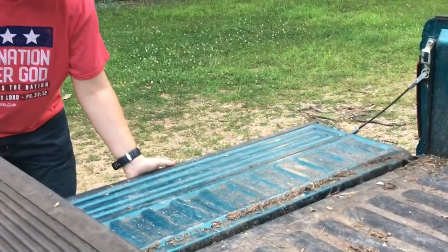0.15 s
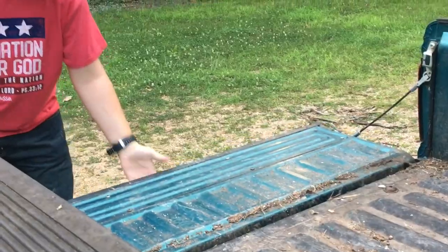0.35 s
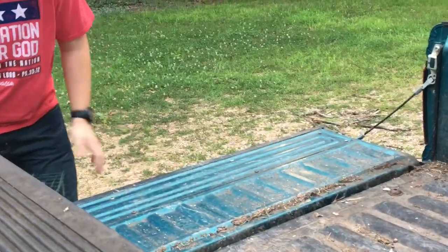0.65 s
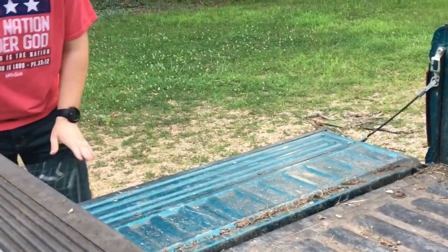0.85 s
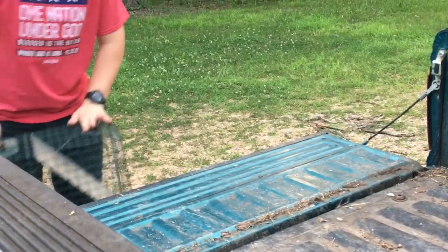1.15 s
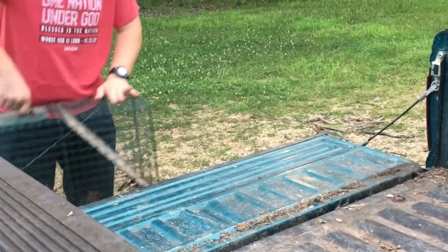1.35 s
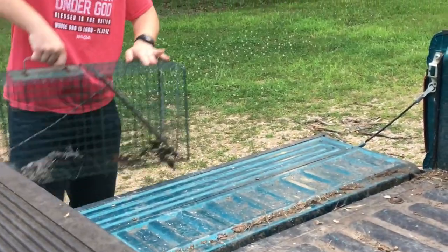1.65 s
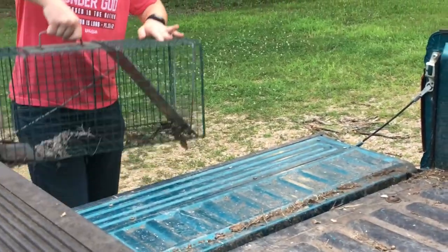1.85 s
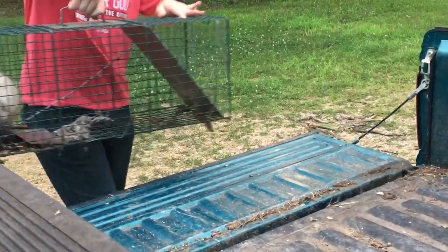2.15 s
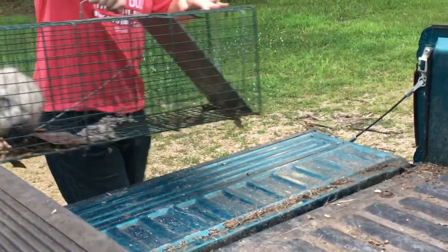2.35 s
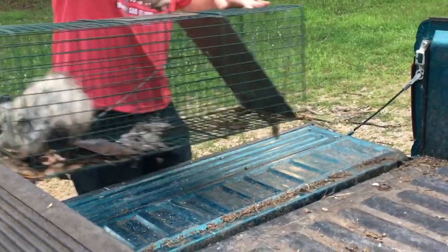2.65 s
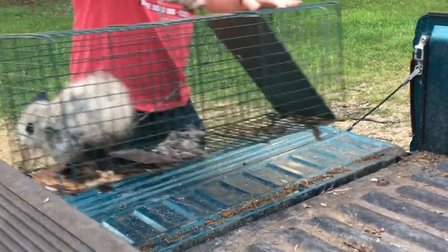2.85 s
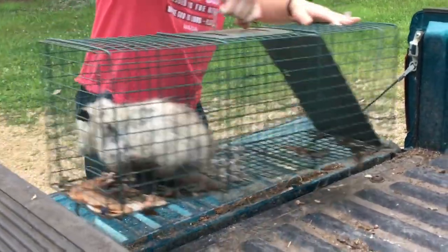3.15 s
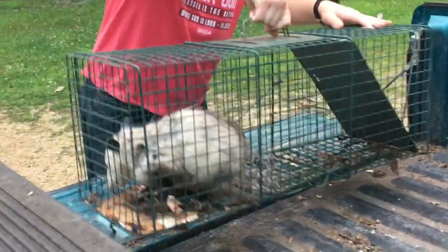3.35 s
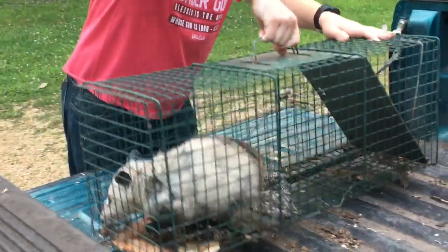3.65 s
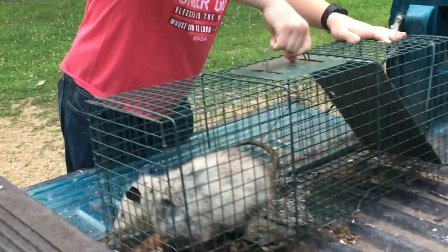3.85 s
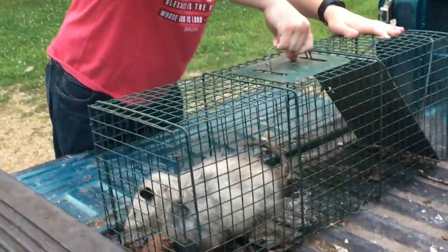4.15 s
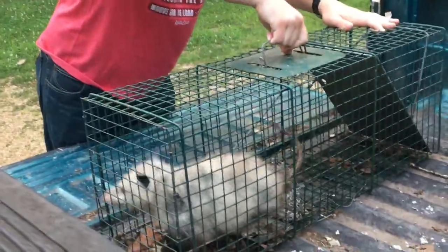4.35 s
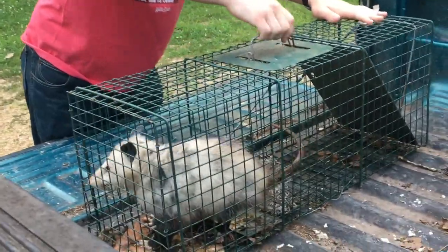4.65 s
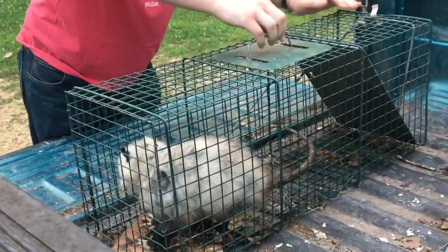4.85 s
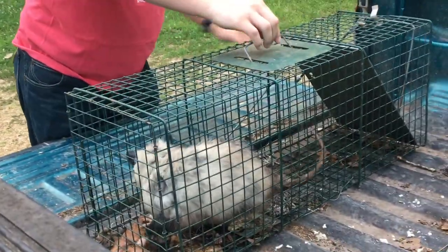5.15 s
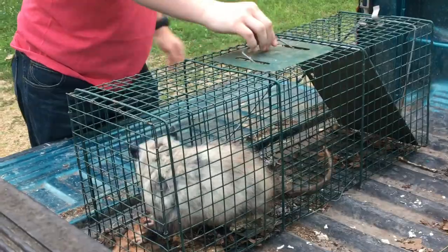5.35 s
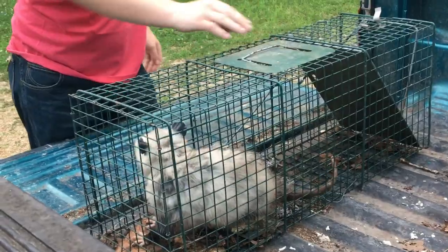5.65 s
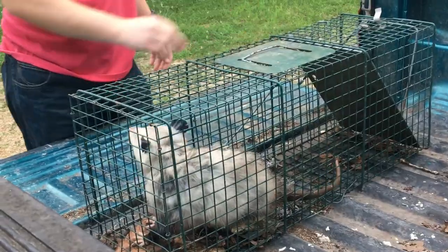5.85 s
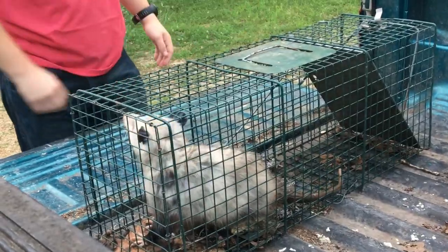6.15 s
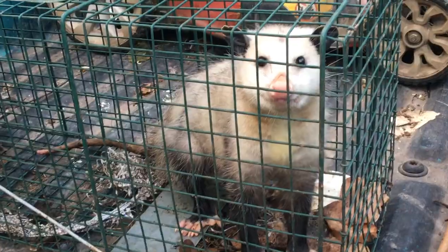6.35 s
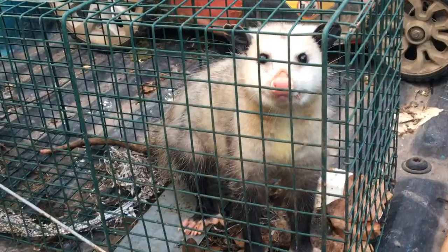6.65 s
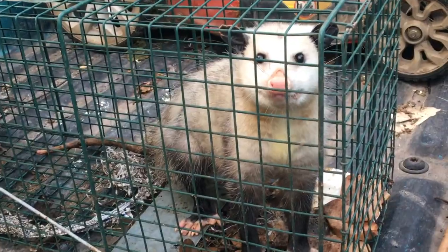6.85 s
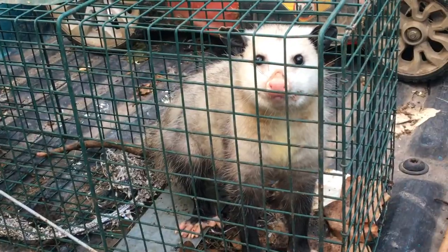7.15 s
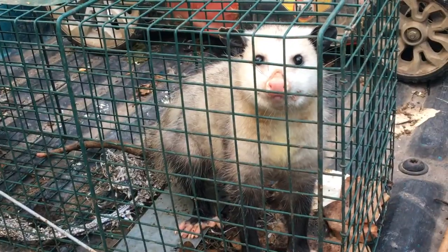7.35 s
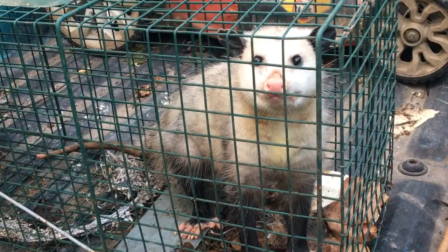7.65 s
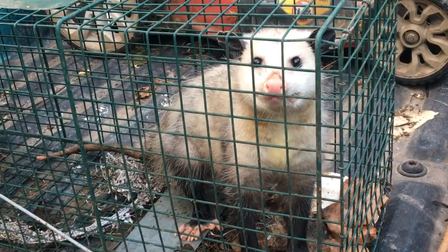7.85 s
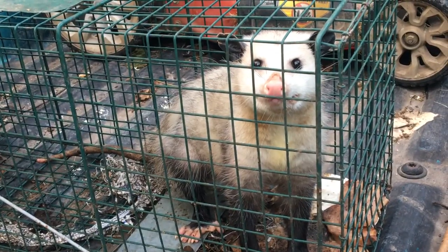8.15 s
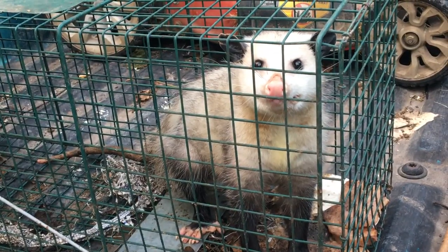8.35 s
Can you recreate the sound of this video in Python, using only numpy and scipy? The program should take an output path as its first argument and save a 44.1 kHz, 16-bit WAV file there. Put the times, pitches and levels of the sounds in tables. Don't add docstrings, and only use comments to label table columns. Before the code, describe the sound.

A quiet farm yard, close to a truck's steel bed, with soft leaves, faint traffic rumble and a steady fast cricket trill. A songbird whistles high in the first second, and distant crows caw hoarsely from about 0.6 to 2.5 s, with a few fainter caws until 3.7. Wire ticks and small frame scrapes accompany the lifting, with a dull bump at 0.9 s. Bumps at 2.75 s precede a sharp sheet-metal snap at 2.94. At 4.07 s the loaded cage lands with the loudest, booming, bouncing clang. Scraping shoves and hollow knocks follow at 4.75 and 5.4 s, dying away by 6. At 6.26 s a brief dip switches to another yard spot with faint hum and cricket. A slight tick at 7.25 precedes a rooster: short piercing note to 7.5, then a long lower, rough, throbbing cry, with faint bird trills, running to the end at 8.5 s.

```python
import sys
import numpy as np
from scipy import signal
from scipy.fft import rfft, irfft, next_fast_len
from scipy.io import wavfile
from scipy.ndimage import uniform_filter1d

SR = 44100
rng = np.random.default_rng(int(sys.argv[2]) if len(sys.argv) > 2 else 0)


def dump(signal):
    limited = np.clip(np.atleast_2d(signal).T, -1, 1)
    pcm = np.round(limited * 32767).astype(np.int16)
    wavfile.write(sys.argv[1], SR, pcm)


def attenuation_scalar(level_db):
    decades = np.asarray(level_db, float) / 20
    return 10 ** decades


N = 374409
T = np.arange(N) / SR
CUT_S = 6.263

# frequency in Hz, level in dB per Hz.
YARD_COLOUR = [(12, -38), (20, 0.5), (65, 3.5), (228, -9.5), (347, -16.5), (399, -24.5), (759, -21.5),
               (1030, -20.5), (1190, -22.5), (3070, -31.5), (4420, -30), (4810, -23.5), (5380, -38.5),
               (12400, -41), (16000, -50.5)]
# frequency in Hz, level in dB per Hz.
LATE_YARD_COLOUR = [(12, -43), (20, -10), (44, 21.5), (70, 1), (301, -24), (607, -29), (759, -32),
                    (873, -29.5), (1260, -31.5), (1400, -34), (3530, -38), (4810, -29), (5380, -41),
                    (12100, -43.5), (16000, -51)]
# frequency in Hz, level in dB per Hz.
RUMBLE_COLOUR = [(22, -27.0), (40, -4.5), (75, -1), (120, -10.5), (200, -19.0), (400, -60.0)]
# time in seconds, level in dB.
TRAFFIC_LEVEL = [(0.0, -51.5), (0.31, -48), (0.57, -58.5), (2.72, -61), (3.31, -54), (3.74, -59),
                 (4.11, -58.5), (4.26, -41), (4.52, -50.5), (5.44, -53), (6.02, -47), (6.15, -59),
                 (6.29, -51.5), (8.49, -51.5)]
# frequency in Hz, width in Hz, level in dB.
SHED_HUM = [(903, 18.7, 5), (1450, 16, -4), (1840, 95, -2.5), (3952, 86, 3)]
# strokes per second, cycles already done at 0 s.
CRICKET_RHYTHM = [
    (36.5966, .138),
    (36.7302, -1.0698),
]

# time in seconds, pitch in Hz, level in dB.
LONG_WHISTLE = [(0.0, 4120, -58), (.03, 4330, -53), (0.055, 4380, -58), (0.122, 4360, -72),
                (.15, 4560, -60), (0.19, 4630, -55), (0.28, 4763, -72), (.33, 4050, -66), (0.37, 3600, -68),
                (0.43, 3370, -68), (.5, 3430, -67), (0.654, 3725, -65), (.95, 3838, -64), (1.17, 3932, -77)]
# time in seconds, pitch in Hz, level in dB.
DROPPING_WHISTLE = [(.04, 4302, -67.5), (.06, 4296, -52), (.095, 3336, -73.5), (.1, 3250, -81.5)]
# time in seconds, pitch in Hz, level in dB.
LATE_TRILL = [(7.59, 3950, -68), (7.7, 4250, -59), (7.85, 4600, -62), (7.96, 4750, -70)]
# time in seconds, pitch in Hz, level in dB.
LATE_WHISTLE = [(7.98, 4050, -69.5), (8.104, 3479, -66), (8.49, 4037, -61)]

# frequency in Hz, level in dB per Hz.
MESH_COLOUR = [(1760, -25), (3000, 6.5), (3380, 3.5), (4230, 0), (4860, -19), (5520, -2.5), (10300, -11),
               (11700, -10.5), (16000, -18)]
# frequency in Hz, level in dB per Hz.
ROD_COLOUR = [(1500, -8), (2600, -1.5), (3400, 1.5), (5000, -4), (6500, -36.5)]
# frequency in Hz, level in dB per Hz.
FRAME_COLOUR = [(250, -9.5), (400, -1), (700, -2.5), (1000, -3.5), (1500, -4), (2000, -3.5), (2800, -18),
                (4500, -39)]
# frequency in Hz, level in dB per Hz.
PUSH_COLOUR = [(30, -34.5), (70, 9.0), (300, 13), (600, 5.5), (1200, -33.0)]
# frequency in Hz, width in Hz, level in dB.
WIRE_MODES = [(1410, 27.8, 5), (1700, 50, 3), (1900, 45, 1), (2600, 93, -7.5), (3450, 60, -3),
              (4120, 83, -3.5), (5460, 100, -9.5), (5880, 42, -29), (6440, 44, -16), (8350, 20, -25),
              (11400, 210, -28.5), (12800, 255, -6.5), (13200, 39, -3)]
# frequency in Hz, level in dB, time to fall 60 dB in seconds.
TAILGATE_MODES = [(74.83, 1.5, 0.5), (154, -11, 0.4), (227.9, -10, 0.18), (279.4, -12, 0.178),
                  (305, -8, 0.07), (412.5, -11, .1), (464.7, -13, 0.1), (552, -14, 0.12)]
# time in seconds, peak in dB, reach into heavier parts in dB, decay in seconds.
WIRE_TICKS = [(.2804, -56, -8, 0.5), (.5269, -41, -5, 0.025), (.6438, -54, -2.5, 0.104),
              (.8025, -54, -24.5, 0.094), (1.0163, -52.5, -9.5, 0.094), (1.1707, -50.5, -3, 0.132),
              (1.22, -48.5, -18.5, .14), (1.2739, -44.5, -30, 0.162), (2.549, -50.5, -25.5, 0.145),
              (2.8952, -47, -21, .1), (2.9438, -21.5, -13, 0.0864), (3.051, -47.5, -9.5, 0.051),
              (3.2168, -58, -1.5, 0.188), (3.553, -52, -13, 0.045), (3.6104, -55.5, -2.5, 0.163),
              (3.705, -46.5, -12, 0.048), (3.991, -42.5, -14, .04), (4.0419, -49, -8, 0.17),
              (4.057, -42, 2, .08), (4.286, -45.5, -14.5, .066), (4.314, -53, -1.5, 0.115),
              (4.596, -53, -5.5, 0.15), (5.1868, -43.5, -6.5, 0.12), (.8681, -45, -12, .04),
              (1.6304, -49, -12, .03), (2.8401, -50, -15, .04), (4.2185, -47, -10, .06)]
# time in seconds, peak in dB, brightness in dB, decay in seconds.
FRAME_SCRAPES = [(.4903, -52.5, -4, 0.0313), (.8585, -57.5, -3.5, 0.0706), (.8885, -46, -1.5, 0.065),
                 (1.3915, -55, -12.5, 0.029), (1.5998, -56.5, -10.5, 0.0835), (2.1879, -53, -16, 0.102),
                 (2.2486, -55, -20, 0.0677), (2.33, -53.5, -18.5, 0.082), (2.397, -53.5, -11.5, 0.065),
                 (2.7176, -47, -22, 0.085), (4.6313, -54, -3, 0.29), (4.724, -45.5, -0.5, 0.284),
                 (5.058, -61.5, 0.5, 0.447), (5.3953, -41, 2.5, 0.331), (5.6194, -52.5, -23, 0.18),
                 (5.9086, -56.5, -24.5, 0.168), (7.2458, -54.5, -2.5, 0.0325)]
# time in seconds, peak in dB, brightness in dB, decay in seconds.
TRAP_BUMPS = [(.1899, -52.5, -1, 0.293), (.9034, -37, -17, 0.115), (.9222, -35, -9.5, 0.096),
              (.9394, -39, -19.5, 0.12), (1.1348, -49, 2.5, 0.21), (1.6281, -52, -5, 0.0848),
              (2.4565, -46.5, -11, 0.0404), (2.732, -40.5, -10.5, 0.099), (2.7423, -38, -3, 0.079),
              (2.7587, -36, -18.5, 0.084), (2.7762, -36, -14, 0.05), (4.0655, -26, -14.5, 0.07),
              (4.2078, -41.5, -3.5, 0.204), (4.746, -37.5, -6.5, 0.208), (4.8456, -45, -12.5, 0.193),
              (5.438, -35, 4.5, 0.195)]
# time in seconds, peak in dB, brightness in dB, decay in seconds.
WEIGHT_BOUNCES = [
    (4.075, -25.5, -11.5, 0.112),
    (4.0997, -27.5, -6.5, 0.175),
    (4.1291, -28, -7.5, 0.0904),
    (4.345, -36, -9.5, 0.125),
]
TICK_SPREAD = [(0, 0.012, -3.5, -22), (0, 0.998, 1.4, 1.32)]
SCRAPE_SPREAD = [(0, -0.83, 0, -6), (1, 0.69, 0, -0.5)]
BUMP_SPREAD = [(0, -5.5, -6, 0), (1, 1, 0, 0)]
BOUNCE_SPREAD = [(0, -7.5, -23, 0), (1, 1, -0.5, 0)]
# time in seconds, effort in dB.
HAND_EFFORT = [(0, -84), (.73, -66.5), (1.11, -62.5), (1.36, -70.5), (2.05, -73.5), (2.38, -68),
               (2.5, -59.5), (2.53, -67.5), (2.85, -62), (3.25, -76.5), (4.15, -67), (4.4, -76.5),
               (5.04, -78), (5.35, -64), (5.67, -79), (6.24, -81.5)]
# time in seconds, peak in dB, seconds to fall 20 dB.
WEIGHT_SHOVES = [
    (0, -54, .5),
    (1.11, -61, 0.03),
    (2.85, -64, 2.),
    (4.22, -32.5, 0.3335),
    (4.81, -44, 0.455),
    (5.28, -50, 0.19),
    (5.53, -37.5, .3),
    (5.75, -54, 0.3),
]
# time in seconds, peak in dB, pitch in Hz, twice the time to fall
# 60 dB in seconds, push length in seconds.
STRUCK_PARTS = [(0.5265, -44, 4100, .015, .001), (.527, -48, 2800, 0.014, .001),
                (0.896, -45.5, 624.4, 0.062, .02), (1.3917, -49, 1305, 0.019, 0.00195),
                (2.205, -53, 1498, 0.0524, .015), (2.344, -50.5, 1518, 0.053, .012),
                (2.348, -56.5, 1950, .04, .01), (2.457, -41.5, 623, 0.0304, 0.00255),
                (2.9445, -36, 3600, .03, .004), (2.9445, -40, 1900, .03, .003),
                (2.738, -39, 390, .06, .012), (3.992, -50.5, 5195, .02, .002),
                (4.0654, -24.5, 1150, 0.0286, .002), (4.066, -29, 930, .04, .003),
                (4.09, -31, 545, .05, .004), (4.0649, -29, 2600, 0.0072, 0.00102),
                (4.0705, -15, 291, .06, 0.0039), (4.092, -28, 380, 0.035, 0.00227),
                (4.11, -31, 259, .08, 0.0053), (4.214, -45.5, 1860, .04, 0.0087),
                (4.342, -38, 310, .12, .01), (4.224, -33, 280, 0.084, 0.0062),
                (4.724, -44, 2050, 0.03, 0.012), (4.729, -42.5, 3311, 0.048, 0.018),
                (4.745, -39.5, 1703, .04, 0.0124), (4.747, -44, 3386, 0.036, 0.0125),
                (4.757, -33.5, 301, 0.053, 0.0031), (4.763, -39.5, 1800, .04, .006),
                (4.778, -36.5, 332, .08, 0.0042), (4.788, -43, 1698, 0.06, 0.0147),
                (5.395, -42, 1795, .04, 0.0103), (5.42, -38, 150, .2, .03),
                (5.406, -37.5, 296.5, .08, 0.0088), (5.407, -38.5, 1752, 0.043, 0.0124),
                (5.424, -39.5, 1897, .04, 0.0113), (5.4405, -29, 332.4, 0.044, 0.0035),
                (5.445, -41, 3500, 0.055, 0.0146), (5.483, -38.5, 301, 0.088, 0.0059),
                (5.51, -37.5, 252, 0.046, 0.0032), (7.244, -47.5, 1400, .015, 0.00102)]

# start in seconds, length in seconds, strongest partial at its top in Hz, level in dB.
CROW_CAWS = [(0.581, 0.136, 1410, -63.5), (.72, 0.154, 1298, -57), (0.999, 0.269, 1439, -61.5),
             (1.445, 0.255, 1330, -57), (1.699, 0.118, 1503, -61.5), (1.862, 0.158, 1400, -59),
             (2.02, 0.261, 1366, -56), (2.2, .09, 1250, -59), (2.27, .08, 1420, -63),
             (2.385, 0.16, 1390, -59.5), (2.99, 0.22, 1450, -66), (3.19, .12, 1400, -70),
             (3.55, .2, 1343, -62)]
# frequency in Hz, level in dB, time to fall 60 dB in seconds.
DOOR_MODES = [(690, -8.5, 0.0174), (1400, -6, 0.024), (1950, -1.5, 0.0175), (3726, -4.5, 0.0086)]
# frequency in Hz, level in dB, time to fall 60 dB in seconds.
CORNER_MODES = [(78.34, -6.5, 0.25), (150, -14, 0.12), (280, -6.5, 0.072), (325, -1, 0.1), (430, -21, 0.06),
                (548.3, -1, 0.09), (1200, -26, 0.028), (2100, -27, .02)]

# time in seconds, pitch in Hz, level in dB, roughness from 0 to 1.
MAIN_MEMBRANE = [
    [(7.27, 1588, -56, 0.06), (7.29, 1445, -47, 0.14), (7.325, 1442, -43.5, 0.13), (7.345, 1435, -55, .2),
     (7.372, 1400, -52, 0.21), (7.388, 1418, -34.5, 0.05), (7.452, 1420, -35, 0.09),
     (7.463, 1426, -52, 0.3), (7.535, 1427, -46, 0.31)],
    [(7.545, 700.6, -48.5, 0.6), (7.62, 774.7, -45.5, 0.52), (7.71, 735.7, -45.5, 0.68),
     (7.79, 778.6, -38, 0.28), (7.95, 783, -38.5, 0.3), (8.1, 750, -41.5, 0.36), (8.3, 744.5, -43.5, 0.31),
     (8.4, 737.9, -48.5, 0.34), (8.49, 748.3, -42, 0.25)],
]
# time in seconds, pitch in Hz, level in dB, roughness from 0 to 1.
SECOND_MEMBRANE = [
    [(7.27, 618.1, -61, 0.85), (7.29, 570.1, -56, 0.4), (7.35, 575, -56, .35), (7.38, 597, -48, .45),
     (7.43, 590, -51, .55), (7.53, 584.8, -55, 0.73)],
    [(7.545, 761.6, -47, 0.694), (7.575, 860, -44.5, 0.36), (7.66, 858.2, -46.5, 0.616),
     (7.75, 842.8, -49, 0.676), (7.95, 819, -47, 0.45), (8.1, 799.4, -51, 0.66)],
]
# half-pitch share from 0 to 1, seconds to settle, high partials in dB.
HALF_PITCH = [
    (0.42, 2., -7),
    (.75, 0.19, 1.5),
    (1.1, 0.38, 7),
    (0.45, 0.22, -3),
]
# frequency in Hz, level in dB.
BEAK_COLOUR = [(300, -43.5), (580, -9.5), (750, -6.5), (1150, 0), (1500, 0.5), (1750, -3), (2070, 0),
               (2240, -29.5), (3000, -12.5), (3800, -41), (4600, -37.5), (5300, -28), (5700, -37),
               (6200, -22.5), (7200, -24), (9000, -36.5), (11000, -43), (14000, -45)]
# frequency in Hz, level in dB.
RASP_COLOUR = [(500, -11.5), (1100, -11), (1500, 6.5), (2000, -6.5), (2500, -20.5), (3500, -20),
               (5500, -24), (6300, -15), (7600, -15), (10000, -36)]
# time in seconds, peak in dB.
STEP_SWELLS = [(7.7858, -30), (7.8377, -33), (7.8731, -32), (7.8936, -30), (7.925, -30), (7.9494, -27),
               (7.9839, -28), (8.0198, -33), (8.0467, -33), (8.0707, -33), (8.1076, -34), (8.1699, -35),
               (8.1909, -36), (8.2193, -35), (8.2388, -34), (8.2712, -36), (8.2971, -38), (8.3186, -39),
               (8.34, -39), (8.3595, -39), (8.3839, -40), (8.4204, -38), (8.4418, -40), (8.4717, -36)]
# time in seconds, pitch in Hz, level in dB.
SIDE_TONES = [
    [(7.268, 1900, -52), (7.285, 1900, -53), (7.31, 2040, -50), (7.335, 2050, -53), (7.355, 2060, -60),
     (7.385, 2030, -49), (7.41, 2060, -58), (7.47, 2050, -62)],
    [(7.4, 700, -64), (7.43, 725, -58), (7.48, 720, -58), (7.53, 700, -63)],
    [(7.536, 1880, -56), (7.545, 1910, -48), (7.556, 1900, -55)],
    [(7.3, 2860, -64), (7.36, 2960, -54), (7.4, 2890, -60), (7.5, 2900, -68), (7.56, 2960, -55),
     (7.6, 2950, -62)],
]


def unit(x):
    return x / np.sqrt(np.mean(x ** 2))


def colour(x, points, lo_hz=0, scale=True):
    size = next_fast_len(len(x), True)
    f = np.fft.rfftfreq(size, 1 / SR) + 1
    p = np.array(points, float)
    gain = attenuation_scalar(np.interp(np.log(f), np.log(p[:, 0]), p[:, 1]))
    gain = gain / (1 + (lo_hz / f) ** 6)
    y = irfft(rfft(x, size) * unit(gain), size)[:len(x)]
    return unit(y) if scale else y


def ring(x, hz, t60):
    r = np.exp(-np.log(1000) / (max(t60, .002) * SR))
    w = 2 * np.pi * hz / SR
    return signal.lfilter([2 * (1 - r) * np.sin(w)], [1, -2 * r * np.cos(w), r * r], x)


def ring_modes(x, modes):
    rings = [ring(x, hz, t60) for hz, _, t60 in modes]
    return sum(attenuation_scalar(row[1]) * r / np.abs(r).max() for row, r in zip(modes, rings))


def walk(rate, size=N):
    k = max(int(SR / rate), 2)
    steps = np.repeat(rng.standard_normal(size // 20)[:size // k + 1], k)
    return unit(uniform_filter1d(uniform_filter1d(steps, k), k)[:size])


def track(table):
    s, *cols = np.transpose(table)
    gate = uniform_filter1d(1. * ((T >= s[0]) & (T <= s[-1])), 300)
    return [np.interp(T, s, c) for c in cols], gate


def tone(hz):
    return np.sqrt(2) * np.sin(2 * np.pi * np.cumsum(hz) / SR)


def echo(x, wet_db, t60):
    t = T[:SR // 2]
    tail = rng.standard_normal(len(t)) * np.exp(-np.log(1000) * t / t60) * (t > .008)
    return x + attenuation_scalar(wet_db) * signal.fftconvolve(x, tail / np.linalg.norm(tail))[:N]


def yard():
    (rumble_db,), _ = track(TRAFFIC_LEVEL)
    rumble = colour(rng.standard_normal(N), RUMBLE_COLOUR) * attenuation_scalar(rumble_db + 1.3 * walk(9))
    swell_db = 1.2
    early = colour(rng.standard_normal(N), YARD_COLOUR, lo_hz=120.3) * attenuation_scalar(-63 + swell_db * walk(5.12))
    late = colour(rng.standard_normal(N), LATE_YARD_COLOUR, lo_hz=133.7) * attenuation_scalar(-60 + swell_db * walk(2.989))
    hum = sum(attenuation_scalar(db) * unit(ring(rng.standard_normal(N), hz, 3.2 / width)) for hz, width, db in SHED_HUM)
    return rumble + np.where(T < CUT_S, early, late + unit(hum) * attenuation_scalar(-70))


def cricket():
    early, late = (rate * T + lag for rate, lag in CRICKET_RHYTHM)
    cycle = (np.where(T < CUT_S, early, late) + .5) % 1 - .5
    hz = 4890 - 800 * cycle
    stroke = np.exp(-(cycle / 0.2) ** 2) * attenuation_scalar(1.0 * walk(13))
    level_db = np.where(T < CUT_S, -72.5, -70)
    return echo(unit(stroke * tone(hz)) * attenuation_scalar(level_db), -25.5, 0.28)


def songbird():
    out = 0
    songs = ((LONG_WHISTLE, .002), (DROPPING_WHISTLE, .002), (LATE_TRILL, .03), (LATE_WHISTLE, .008))
    for table, flutter in songs:
        (hz, db), gate = track(table)
        out = out + gate * attenuation_scalar(db + 3.22 * walk(40)) * tone(hz * (1 + flutter * walk(250)))
    return echo(out, -0.97, 0.597)


def chatter(rate, spread_db):
    hit = rng.random(N) < rate / SR
    return unit(hit * rng.standard_normal(N) * attenuation_scalar(spread_db * rng.exponential(size=N)))


def contacts():
    kinds = ((WIRE_TICKS, TICK_SPREAD), (FRAME_SCRAPES, SCRAPE_SPREAD),
             (TRAP_BUMPS, BUMP_SPREAD), (WEIGHT_BOUNCES, BOUNCE_SPREAD))
    return [(s, *(db + np.array(offset) + tone_db * np.array(share)), decay)
            for rows, (offset, share) in kinds for s, db, tone_db, decay in rows]


def bursts(column, slower, rise_s, tick):
    power, touch = np.zeros(N), np.zeros(N)
    for row in contacts():
        i = int(row[0] * SR)
        fall_s = slower * max(row[5], .01)
        t = T[:min(int(fall_s * SR), N - i)]
        shape = np.clip(t / rise_s, 0, 1) * np.exp(-np.log(1000) * t / fall_s)
        power[i:i + len(t)] += (attenuation_scalar(row[column]) * shape) ** 2
        touch[i] = tick * attenuation_scalar(row[column])
    return np.sqrt(power), touch


def part(points, lo_hz, rate, spread_db, column, rustle, slower, rise_s, tick):
    envelope, touch = bursts(column, slower, rise_s, tick)
    hits = chatter(rate, spread_db) * (envelope + rustle) + touch
    return colour(hits, points, lo_hz, scale=False)


def shoves():
    rise = 0.46
    swells = sum(attenuation_scalar(db - 20 * np.maximum(T - s, (s - T) / rise) / fall) for s, db, fall in WEIGHT_SHOVES)
    return swells * (T < CUT_S)


def cage():
    (hands_db,), gate = track(HAND_EFFORT)
    mesh = attenuation_scalar(-11) * part(MESH_COLOUR, 4424, 12000, 2.04, column=1, rustle=gate * attenuation_scalar(hands_db + 4.0),
                           slower=0.888, rise_s=0.00069, tick=1.73)
    rods = attenuation_scalar(-6) * part(ROD_COLOUR, 0, 10000, 1.2, column=2, rustle=gate * attenuation_scalar(hands_db - 3.0),
                          slower=1.497, rise_s=0.00185, tick=1.8)
    frame = attenuation_scalar(-3.5) * part(FRAME_COLOUR, 289, 9000, 1.2, column=3, rustle=gate * attenuation_scalar(hands_db + 1.0),
                             slower=1.972, rise_s=0.00244, tick=2.2)
    metal = mesh + rods + frame
    wires = sum(attenuation_scalar(db) * ring(metal, hz, 0.88 / width) for hz, width, db in WIRE_MODES)
    push = part(PUSH_COLOUR, 60, 2500, 1.51, column=4, rustle=shoves() * attenuation_scalar(-5),
                slower=1.0, rise_s=0.00271, tick=3.)
    panel = sum(attenuation_scalar(db) * ring(push, hz, t60) for hz, db, t60 in TAILGATE_MODES)
    boom = attenuation_scalar(4.5) * panel + attenuation_scalar(-6.5) * push
    return echo(set_down() + struck() + metal + attenuation_scalar(-6.0) * wires + boom, -9, 0.156)


def struck():
    out = np.zeros(N)
    for s, db, hz, t60, push_s in STRUCK_PARTS:
        i = int(s * SR)
        t = T[:SR // 8][:N - i]
        jolts = rng.standard_normal(SR // 8)[:len(t)]
        shaky_sine = np.sin(2 * np.pi * hz * t + np.cumsum(jolts) * hz / 5000)
        blow = np.exp(-t / max(push_s, .0003)) * (0.33 * jolts + shaky_sine)
        r = ring(blow, hz, .5 * t60) + 0.73 * ring(blow, 1.131 * hz, .5 * t60)
        out[i:i + len(t)] += attenuation_scalar(db) * r / np.abs(r).max()
    return out


def crows():
    rise_s, scoop, sag_per_s = .035, .08, .65
    attack_db, fade_db = -4, -6.5
    throat_hz, gain = np.full(N, 1300.), np.zeros(N)
    for s, length, hz, db in CROW_CAWS:
        on = (T >= s) & (T < s + length)
        t = T[on] - s - rise_s
        early, late = np.maximum(-t, 0) / rise_s, np.maximum(t, 0)
        throat_hz[on] = hz * (1 - scoop * early - sag_per_s * late)
        gain[on] = attenuation_scalar(db + attack_db * early + fade_db * late / length)
    gain = uniform_filter1d(gain, 300)
    out = 0
    for ratio, part_db, hoarse in ((1, -2.5, .026), (.92, -8, .035), (1.36, -12.5, .04), (2 / 3, -20, .04)):
        phase = 2 * np.pi * np.cumsum(ratio * throat_hz * (1 + hoarse * walk(306.9))) / SR
        out = out + gain * attenuation_scalar(part_db + 2.8 * walk(80)) * np.sin(phase)
    return attenuation_scalar(3.0) * echo(out, -3.5, 0.79)


def snap():
    start_s, level_db = 2.944, -32.5
    t = np.maximum(T - start_s, 0)
    hits = chatter(2500, 1.97) * np.exp(-t / .015) * (t > 0)
    return attenuation_scalar(level_db) * ring_modes(hits, DOOR_MODES)


def set_down():
    start_s, level_db, blow_s = 4.0655, -17, 0.00114
    t = T - start_s
    blow = np.sin(np.pi * t / blow_s) * (t > 0) * (t < blow_s)
    return attenuation_scalar(level_db - 6.5) * ring_modes(blow, CORNER_MODES)


def membrane(table, half, settle_s, high_db, swell_db, count):
    columns, gate = track(table)
    on = gate > 0
    hz, db, rough = (c[on] for c in columns)
    size = len(hz)
    half = half * np.exp(-T[:size] / settle_s)
    rough = np.clip(rough, 0, 1)
    hz = hz * (1 + 0.02223 * rough * walk(250, size=size)) / 2
    throb = np.maximum(1 + .5 * rough * walk(260, size=size), 0)
    wobble = 1.64 * rough * walk(160, size=size)
    phase = 2 * np.pi * np.cumsum(hz) / SR
    beak = np.array(BEAK_COLOUR, float)
    stack = attenuation_scalar(-7.5) * rough * colour(rng.standard_normal(size), RASP_COLOUR)
    held_db = -1.2 * np.maximum(db + 41, 0)
    for k in range(1, count):
        partial_hz = k * hz
        high = partial_hz > 2550
        gain_db = np.interp(np.log(partial_hz), np.log(beak[:, 0]), beak[:, 1])
        gain_db += (held_db + high_db * (partial_hz > 4500)) * high
        gain_db += 0.63 * held_db * (partial_hz < 1000)
        gain = attenuation_scalar(gain_db) * (partial_hz < .4 * SR)
        if k % 2:
            gain *= np.minimum(half * (k + 1.86) / 11, 1) * np.where(high, .3, 1)
        gain *= attenuation_scalar(swell_db[on] * (1 if 2 < k < 7 else .35))
        gain *= throb * (1 + .5 * rough * walk(150.06, size=size))
        stack += gain * np.sin(k * phase + k * k + wobble * min(k / 4, 1.3))
    out = np.zeros(N)
    out[on] = np.sqrt(2) * stack * attenuation_scalar(db)
    return out * gate


def throbs():
    rise_s, dip_db, over_db = .009, -6.5, 6.3
    (_, level_db, _), gate = track(MAIN_MEMBRANE[1])
    lift_db = dip_db * gate * np.clip((T - STEP_SWELLS[0][0] + .06) / .05, 0, 1)
    for s, db in STEP_SWELLS:
        span = slice(int(s * SR) - 180, int(s * SR) + 3000)
        t = (T[span] - T[span][0]) / rise_s
        peak_db = db - level_db[span] - over_db - dip_db
        lift_db[span] = np.maximum(lift_db[span], dip_db + peak_db * t * np.exp(1 - t))
    return lift_db


def rooster():
    swell_db = throbs()
    syllables = zip(MAIN_MEMBRANE + SECOND_MEMBRANE, HALF_PITCH)
    voice = sum(membrane(table, *half, swell_db, count=36) for table, half in syllables)
    for table in SIDE_TONES:
        (hz, db), gate = track(table)
        voice = voice + gate * attenuation_scalar(db + 2.5 * walk(90)) * tone(hz * (1 + .008 * walk(200)))
    return echo(voice, -11, .3)


def scene():
    return (yard() + cricket() + songbird() + cage() + crows() + snap() + rooster())[None]


def band_limit(x):
    return signal.sosfilt(signal.butter(12, 16660, fs=SR, output="sos"), x)


def record(dry):
    fade_out_s, fade_in_s = .032, 0.057
    fade = np.clip(np.maximum((CUT_S - T) / fade_out_s, (T - CUT_S) / fade_in_s), .03, 1)
    band = signal.sosfilt(signal.butter(2, 42, "high", fs=SR, output="sos"), dry)
    band = signal.sosfilt(signal.ellip(10, .2, 70, 15800, fs=SR, output="sos"), band)
    return band_limit(band * fade)


dry = scene()
out = record(dry)
dump(out)
```